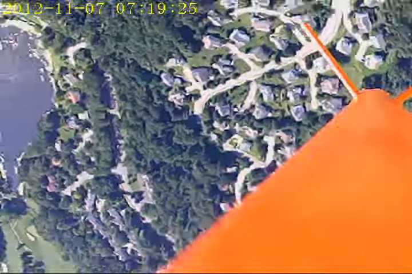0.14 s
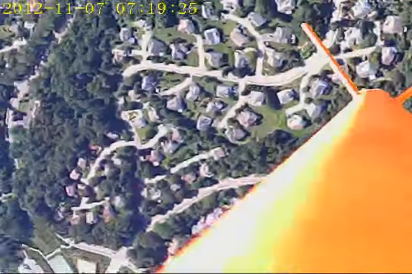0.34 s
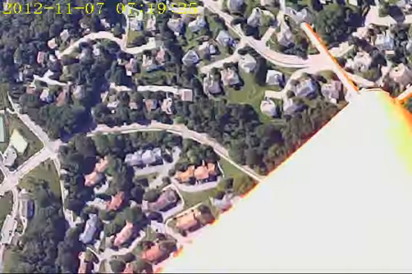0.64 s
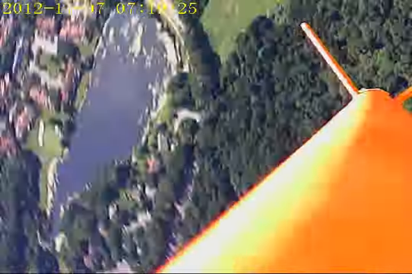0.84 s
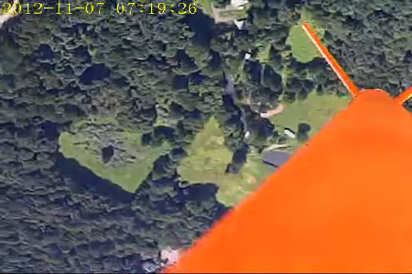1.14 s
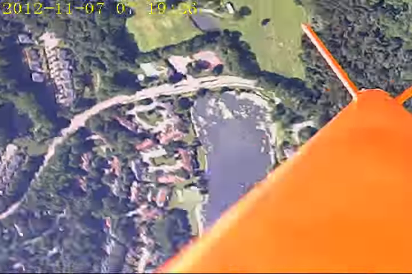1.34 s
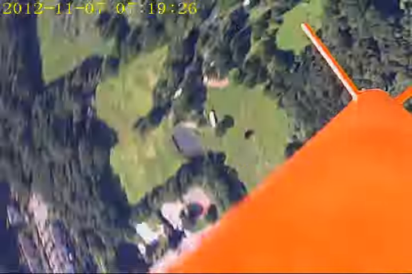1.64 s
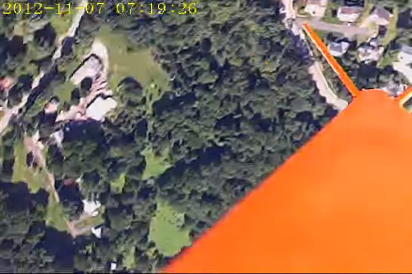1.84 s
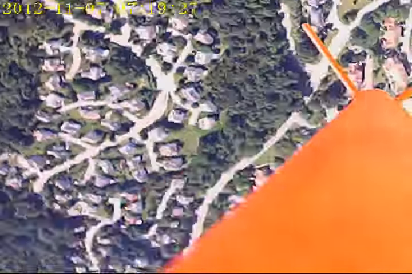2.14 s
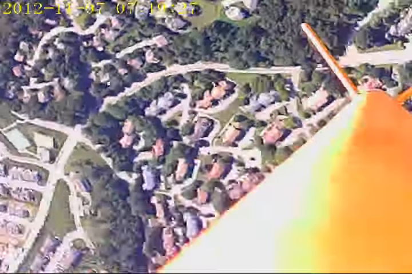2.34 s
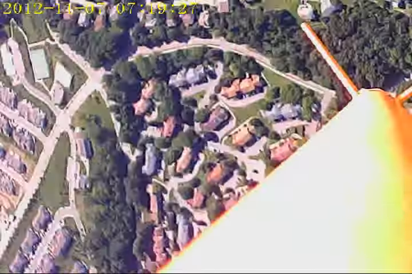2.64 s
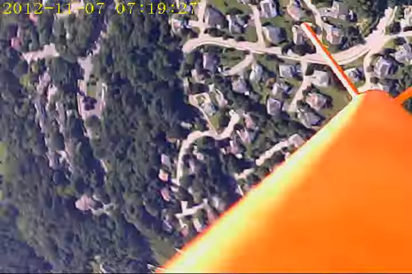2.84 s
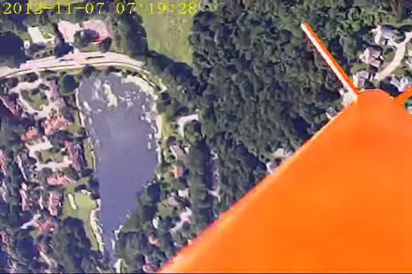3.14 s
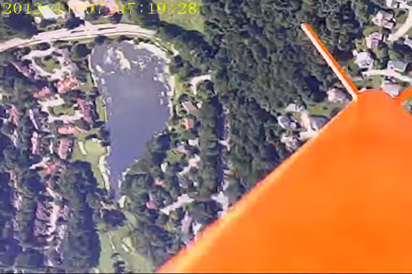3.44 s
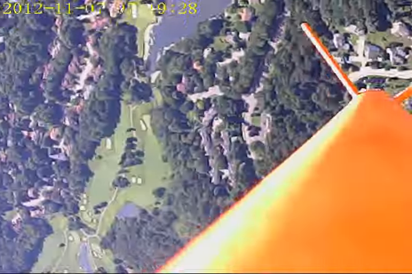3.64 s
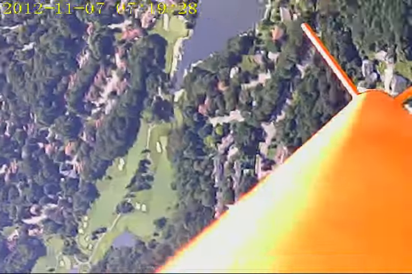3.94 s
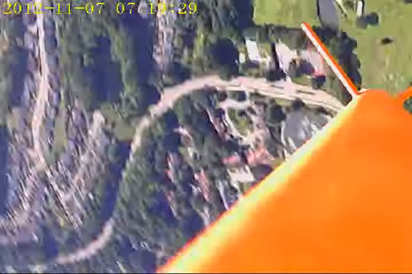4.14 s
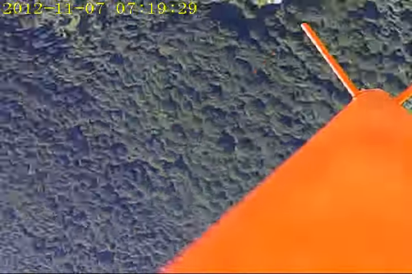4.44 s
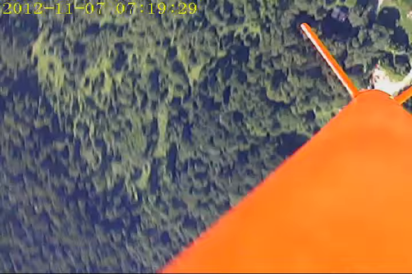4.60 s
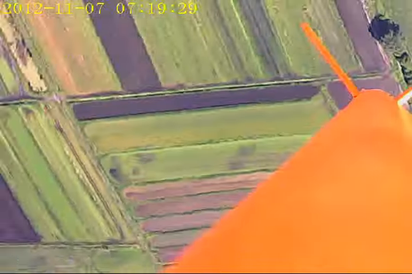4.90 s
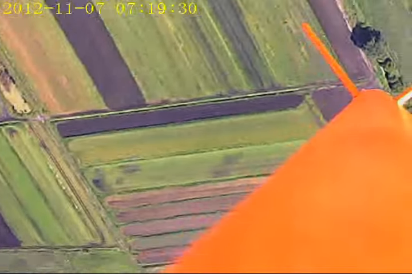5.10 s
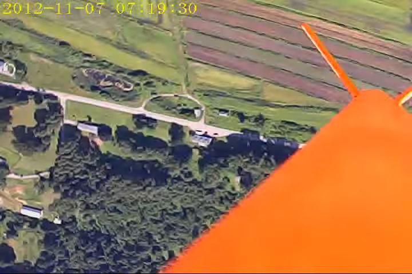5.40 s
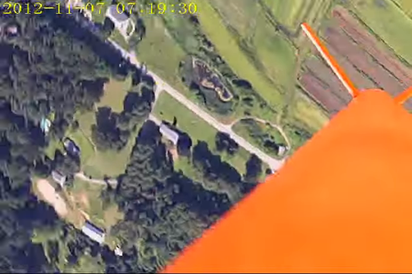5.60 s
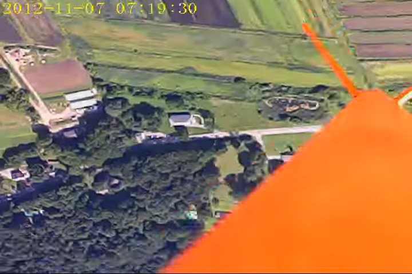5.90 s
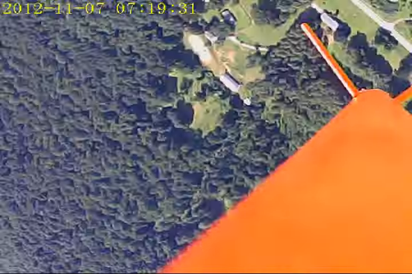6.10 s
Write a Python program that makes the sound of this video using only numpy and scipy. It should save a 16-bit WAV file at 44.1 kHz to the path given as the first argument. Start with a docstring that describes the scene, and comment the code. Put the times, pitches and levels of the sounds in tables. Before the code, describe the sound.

Heard from a microphone mounted on a spinning model rocket in the open sky, wind roars throughout with a hollow, fluttering tone. An early gust swells, then short bursts of plastic crackling and knocking cut through, very close, the loudest slightly distorted. After the strongest knocks, a faint high whistle comes and goes, and a last click sounds as the air keeps rushing.

```python
"""Air tears past the microphone port of a small camera on a model rocket spinning high up.
Its eddies make low buffeting, a drone, a broad roar, a howl in the port's cavity and hiss;
an edge sheds one faint whistle. The plastic case ticks, crackles and knocks in the airstream;
the loudest knocks and crackles clip briefly."""
import sys
import numpy as np
from scipy import signal
from scipy.fft import rfft, irfft
from scipy.io import wavfile
from scipy.ndimage import uniform_filter1d

SR = 44100
rng = np.random.default_rng(int(sys.argv[2]) if len(sys.argv) > 2 else 0)


def pcm_store(signal):
    """Save signal as 16-bit PCM."""
    levels = np.round(np.clip(np.atleast_2d(signal), -1, 1) * 32767)
    wavfile.write(sys.argv[1], SR, levels.astype(np.int16).T)


N = 276066
TIME_S = np.arange(N) / SR


def from_db(db):
    """Decibels to gain."""
    return 10 ** (np.asarray(db) / 20)


def rms(x):
    """Root mean square."""
    return np.sqrt(np.mean(x ** 2) + 1e-20)


def in_time(rows):
    """Interpolate each column after the first (seconds) to every sample."""
    times_s, *columns = np.transpose(rows)
    return [np.interp(TIME_S, times_s, column) for column in columns]


def drift(rate_hz):
    """Smooth random wander, rms 1, rolled off above rate_hz."""
    hz = np.fft.rfftfreq(N, 1 / SR)
    slow = irfft(rfft(rng.standard_normal(N)) / (1 + (hz / rate_hz) ** 2), N)
    return slow / rms(slow)


def eddies(low_hz, high_hz, steadiness):
    """One size range of eddies, coloured by the port; rms 1. Steadiness (0 to 1) evens out swells."""
    # Airstream spectrum. Each row: frequency in Hz, relative density in dB.
    air_spectrum = [(12, -38), (22, -11.5), (48, -2), (122, -2.5), (156, -2.5), (196, -1), (366, -3.5),
                    (605, -5), (758, -4), (1490, -6.5), (2400, -19), (4170, -26), (4730, -30), (5920, -33),
                    (7420, -41.5), (8000, -50.5), (10400, -83), (17600, -120)]
    # Port and cavity resonances. Each row: centre in Hz, width in Hz, lift in dB.
    port_modes = [(192, 49, 0.5), (435, 240, 0.5), (832, 84, 2), (1470, 490, 1), (2315, 170, -2.5),
                  (4750, 600, 0), (5720, 710, 4), (7640, 1800, 6)]
    hz = np.fft.rfftfreq(N, 1 / SR) + 1e-3
    points_hz, points_db = np.transpose(air_spectrum)
    air_db = np.interp(np.log(hz), np.log(points_hz), points_db)
    port_db = sum(lift_db / (1 + (2 * (hz - centre_hz) / width_hz) ** 2)
                  for centre_hz, width_hz, lift_db in port_modes)
    band = 1 / np.sqrt((1 + (low_hz / hz) ** 24) * (1 + (hz / high_hz) ** 24))
    noise = irfft(rfft(rng.standard_normal(N)) * from_db(air_db + port_db) * band, N)
    power = uniform_filter1d(uniform_filter1d(noise ** 2, size=3200), size=2000)
    noise /= np.sqrt(power + 1e-20) ** steadiness
    return noise / rms(noise)


def gust_db(band_hz, reach_octaves=1.4):
    """Each gust swells and fades, lifting most the eddies near its own pitch."""
    # Each row: peak time in seconds, half length in seconds, lift in dB, pitch in Hz.
    gusts = [(0.504, .13, 12.5, 302), (1.21, 0.023, 5, 1290), (1.534, 0.091, 5.5, 130),
             (1.8, 0.15, 4.4, 810), (1.97, 0.023, 4.5, 245), (2.63, 0.17, 3, 1400),
             (3.708, 0.024, 3.5, 1100), (3.98, 0.06, 2.5, 1070), (4.27, .026, 4, 540), (4.89, 0.2, 5, 115)]
    octave = np.mean(np.log2(band_hz))
    total_db = np.zeros(N)
    for peak_s, half_s, lift_db, pitch_hz in gusts:
        nearness = np.exp(-((octave - np.log2(pitch_hz)) / reach_octaves) ** 2)
        total_db += lift_db * nearness * np.exp(-((TIME_S - peak_s) / half_s) ** 2)
    return total_db


def airstream():
    """Huge eddies buffet; drone, roar and howl follow flow and gusts; the finest hiss in quick spurts."""
    # Flow at the port as the rocket turns, buffeting and hiss.
    # Each row: time in seconds, relative level in dB.
    flow_curve = [(0.0, -0.99), (0.22, -2), (0.9, 0.2), (1.28, -0.34), (1.4, -3.5), (1.7, 1.6), (1.94, 1.6),
                  (2.0, -0.26), (3.22, -1.3), (3.38, 2), (3.76, -0.4), (4.38, -0.7), (4.48, -3), (5.3, 0.4),
                  (5.52, -2.5), (5.6, 0.08), (5.86, 1), (6.26, 1.6)]
    buffet_curve = [(0.0, -32.35), (0.16, -25), (0.28, -33.11), (0.52, -20.5), (1.02, -33), (1.24, -18),
                    (1.62, -33.5), (1.8, -22), (2.0, -31), (2.26, -23.32), (2.92, -25), (3.02, -29.5),
                    (3.46, -21.84), (4.14, -23), (4.24, -18.5), (4.4, -24.5), (4.84, -33.44), (5.32, -18),
                    (5.42, -26.5), (5.72, -28.5), (5.86, -20.19), (6.26, -21.5)]
    hiss_curve = [(0.0, -31), (0.64, -35), (0.82, -31.5), (1.34, -35), (1.82, -29), (2.44, -36.64),
                  (2.6, -33), (3.32, -33.5), (4.68, -34.5), (4.96, -31.5), (5.42, -35.5), (5.7, -32),
                  (6.14, -34.5), (6.26, -30)]
    # Band edges between eddy sizes, in Hz.
    edges_hz = (18, 110, 300, 750, 2300, 12000)
    huge, large, middle, small, fine = zip(edges_hz, edges_hz[1:])
    (flow_db,), (buffet_db,), (hiss_db,) = map(in_time, (flow_curve, buffet_curve, hiss_curve))
    spurts = drift(rate_hz=61)
    buffet = from_db(buffet_db - 0.4) * eddies(*huge, steadiness=0.18)
    drone = from_db(-20.5 + 0.92 * flow_db + gust_db(large)) * eddies(*large, steadiness=0.17)
    roar = from_db(-18.5 + 1.13 * flow_db + gust_db(middle)) * eddies(*middle, steadiness=0.37)
    howl = from_db(-18.5 + flow_db + gust_db(small) + 1.2 * spurts) * eddies(*small, steadiness=0.3)
    hiss = from_db(hiss_db - 0.42 + 0.91 * spurts) * eddies(*fine, steadiness=1.0)
    return buffet + drone + roar + howl + hiss


def resonate(x, hz, width_hz):
    """Two-pole resonance, peak gain 1."""
    radius = np.exp(-np.pi * width_hz / SR)
    forward = np.array([1, 0, -1]) * (1 - radius ** 2) / 2
    feedback = [1, -2 * radius * np.cos(2 * np.pi * hz / SR), radius ** 2]
    return signal.lfilter(forward, feedback, x + 1e-18)


def case_ring(force):
    """The plastic case rings briefly in all its modes, alternating in sign."""
    # Each row: frequency in Hz, width in Hz, gain in dB.
    case_modes = [(880, 170, 7.5), (1887, 345, 7), (2800, 390, -0.5), (3400, 430, -1), (4220, 290, -2.5),
                  (5030, 770, -5), (6010, 500, -4), (7360, 450, -11.5)]
    return sum((-1) ** k * from_db(db) * resonate(force, hz, width_hz)
               for k, (hz, width_hz, db) in enumerate(case_modes))


def ticks(per_s, force_db, spread_db):
    """The shaking case ticks faintly at random."""
    hits = rng.random(N) < per_s / SR
    forces = from_db(force_db - spread_db * np.clip(rng.standard_normal(N), -2, 2))
    return case_ring(hits * forces * rng.choice([-1, 1], N))


def slips(creep_db=-31, spread_db=0.5, scatter_s=0.014):
    """The case slips against its mount; it creeps faintly once just before or after each loud slip."""
    # Each row: time in seconds, relative treble level in dB, length in seconds, hardness in dB of lift.
    loud_slips = [(0.933, -23, 0.0024, -13), (1.357, -20.5, 0.0026, 4), (1.384, -22, .0026, -2),
                  (1.3884, -22.5, .003, -5), (1.4, -26, .002, -2), (1.4214, -18, 0.0026, 2),
                  (1.459, -24, 0.0031, -7), (2.367, -35, .003, 10), (2.73, -27, .0066, 0),
                  (3.922, -21, 0.0018, -6), (3.986, -23, .004, -9), (3.995, -26, .0035, -2),
                  (4.0105, -19, .003, 6), (4.021, -24.5, 0.0047, 2), (4.205, -31, 0.0072, 3),
                  (4.28, -26, .0017, 0), (4.406, -26, 0.003, 3), (4.4455, -25, 0.005, -3),
                  (4.554, -19.5, 0.01, -2), (4.5616, -14.5, 0.0035, 7), (4.572, -18, .0045, -8),
                  (5.047, -26, 0.0037, 2), (5.392, -28.5, .005, -6), (5.785, -24.5, .002, 3),
                  (5.884, -24, .004, 3), (5.9302, -23, 0.002, 2), (6.0069, -28, .004, -10)]
    draws = rng.standard_normal((len(loud_slips), 2))
    creeps = [(time_s + scatter_s * lag, creep_db - spread_db * drop, length_s, hardness_db)
              for (time_s, _, length_s, hardness_db), (lag, drop) in zip(loud_slips, draws)]
    return loud_slips + creeps


def crackles(gain_db, hard_above_hz):
    """Each slip is a few milliseconds of tiny catches that ring the case; hard slips are brighter."""
    out, size = np.zeros(N), 1024
    t = (np.arange(size) - size // 2) / SR
    hz = np.fft.rfftfreq(size, 1 / SR)
    highpass = signal.butter(4, 2300, "high", fs=SR, output="sos")
    shelf = hz ** 8 / (hz ** 8 + hard_above_hz ** 8)
    steepness = np.where(t < 0, 1.3, 1.8)   # grip builds, then lets go faster
    for time_s, treble_db, length_s, hardness_db in slips():
        grip = np.exp(-(steepness * t / length_s) ** 2)
        catches = rfft(rng.standard_normal(size) * grip)
        catches /= np.abs(catches) + 1e-9   # flat spectrum: all modes pushed about equally
        slip = case_ring(grip * irfft(catches * from_db(hardness_db * shelf), size))
        treble_power = np.sum(signal.sosfilt(highpass, slip) ** 2) / (length_s * SR)
        start = round(time_s * SR) - size // 2
        out[start:start + size] += from_db(treble_db + gain_db) * slip / np.sqrt(treble_power)
    return out[:N]


def knocks(gain_db, band_ratio):
    """A soft contact rings the lower modes of the case, a firm one snaps in the upper ones."""
    # Each row: start in seconds, relative level in dB, contact pitch in Hz.
    contacts = [(1.36, -7, 1890), (1.361, -10, 5000), (1.4213, -15, 1700), (3.994, -8, 1900),
                (3.9945, -14, 3460), (4.0103, -6, 1920), (4.02, -3, 880), (4.444, -11.5, 2100),
                (4.5402, -8, 1890), (4.5559, -3.5, 850), (4.56, -3, 3400), (4.6083, -5.5, 1630),
                (5.9274, -2, 2870), (5.9289, -4, 4200)]
    force = np.zeros(N)
    for start_s, level_db, hz in contacts:
        bandpass = signal.butter(2, [hz / band_ratio, hz * band_ratio], "band", fs=SR, output="sos")
        blow = signal.sosfilt(bandpass, signal.unit_impulse(1024))
        start = round(start_s * SR)
        force[start:start + len(blow)] += from_db(level_db + gain_db) * blow
    return case_ring(force)


def whistle(waver_hz):
    """Vortices shed from an edge give an unsteady tone as the rocket turns across the flow."""
    # Each row: time in seconds, pitch in Hz, level in dB.
    edge_tone = [(4.68, 2460, -62), (4.78, 2470, -43), (4.87, 2545, -41), (4.94, 2550, -41),
                 (5.0, 2500, -40), (5.06, 2400, -41), (5.15, 2270, -47), (5.24, 2130, -73)]
    pitch_hz, level_db = in_time(edge_tone)
    sounding = (TIME_S > edge_tone[0][0]) & (TIME_S < edge_tone[-1][0])
    phase = 2 * np.pi * np.cumsum(pitch_hz + waver_hz * drift(rate_hz=99)) / SR
    return sounding * from_db(level_db) * np.sin(phase)


def scene():
    """Case and airstream, both right at the microphone; mono."""
    rattle = crackles(gain_db=0.2, hard_above_hz=4900)
    rattle += knocks(gain_db=27.5, band_ratio=1.215)
    rattle += ticks(per_s=25, force_db=-2.5, spread_db=1.9)
    return (airstream() + whistle(waver_hz=10) + rattle)[None]


def record(dry):
    """The sound has a slight offset, clipped peaks and no high treble."""
    cutoff_hz, dc_offset = 8100, -0.0396
    lowpass = signal.firwin(241, cutoff_hz, window="blackman", fs=SR)[None]
    narrow = signal.fftconvolve(dry, lowpass, "same")
    clipped = np.clip(narrow + dc_offset, -1, 1)
    return signal.fftconvolve(clipped, lowpass, "same")


dry = scene()
out = record(dry)
pcm_store(out)
```